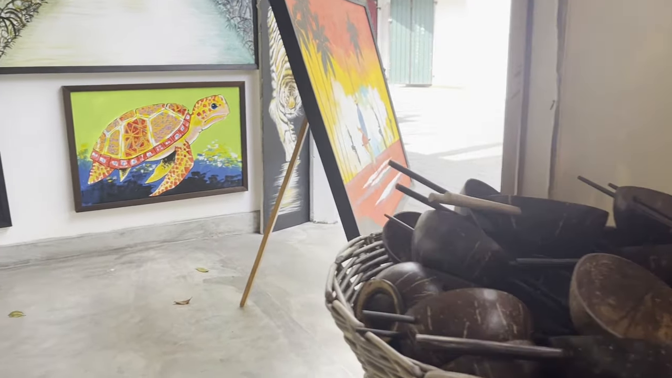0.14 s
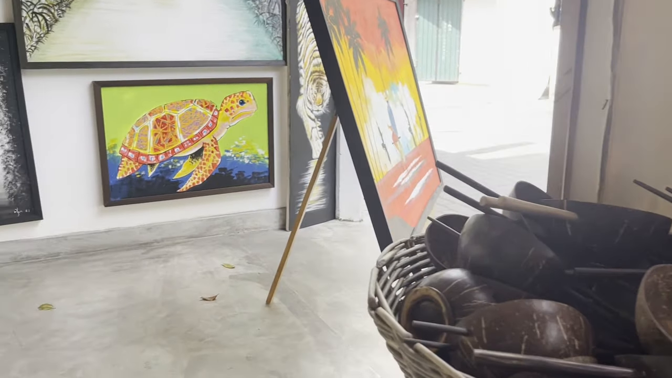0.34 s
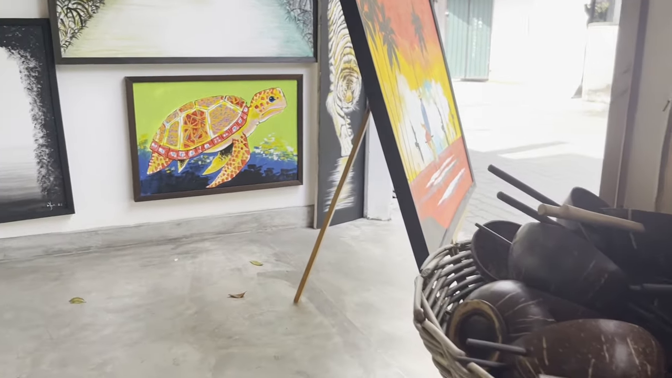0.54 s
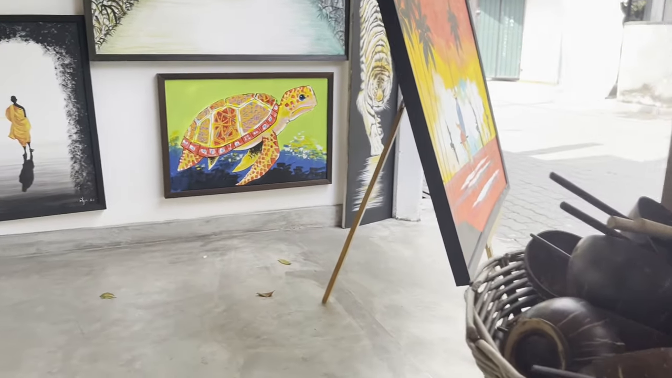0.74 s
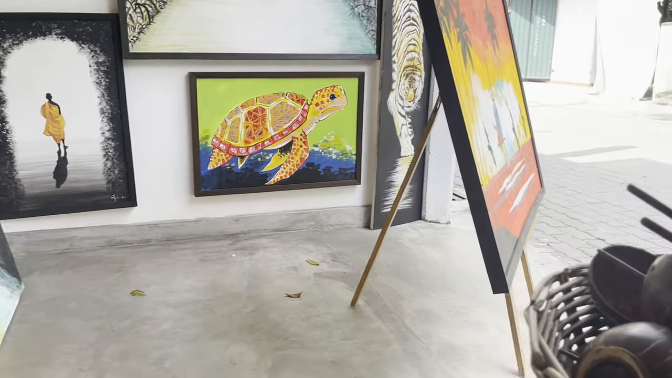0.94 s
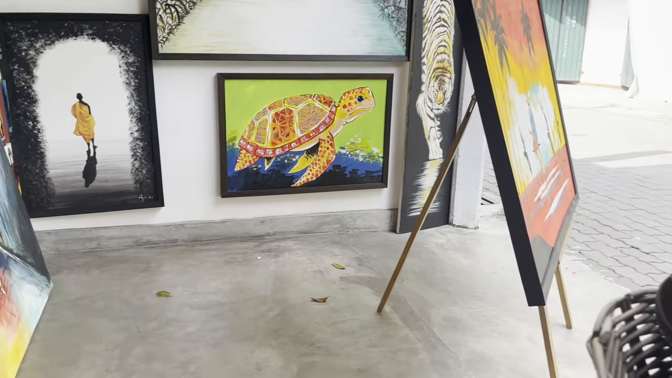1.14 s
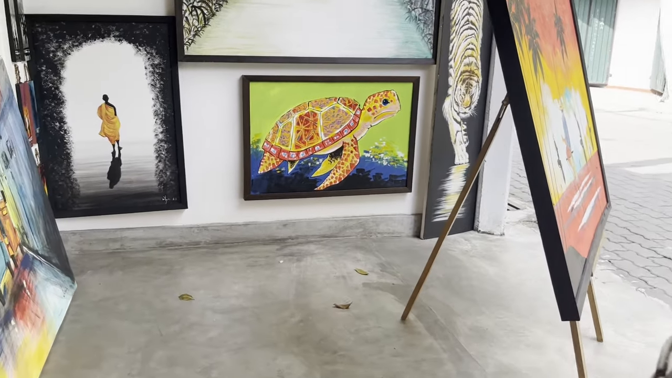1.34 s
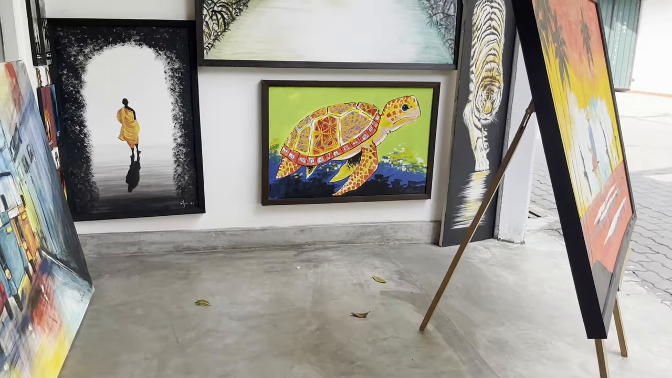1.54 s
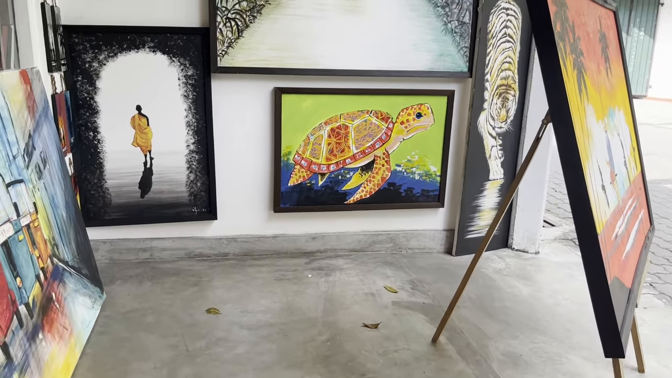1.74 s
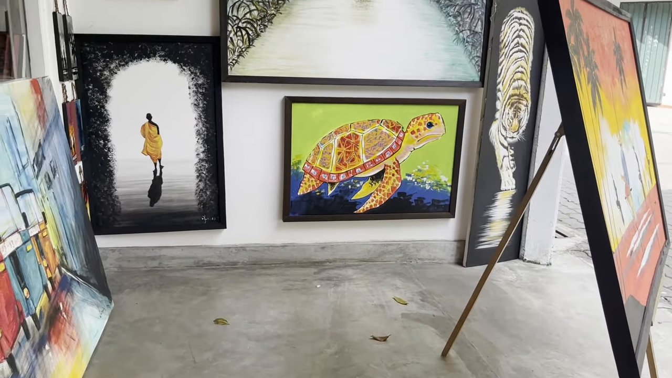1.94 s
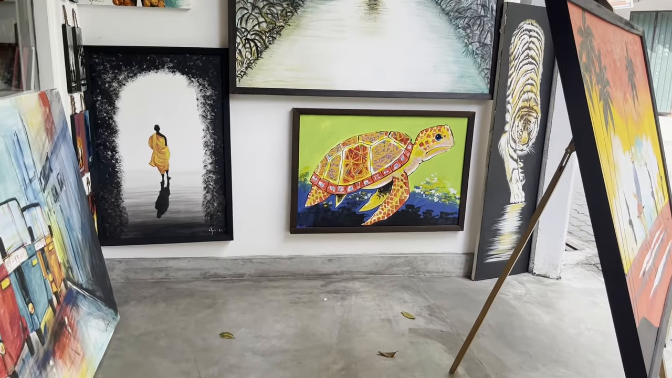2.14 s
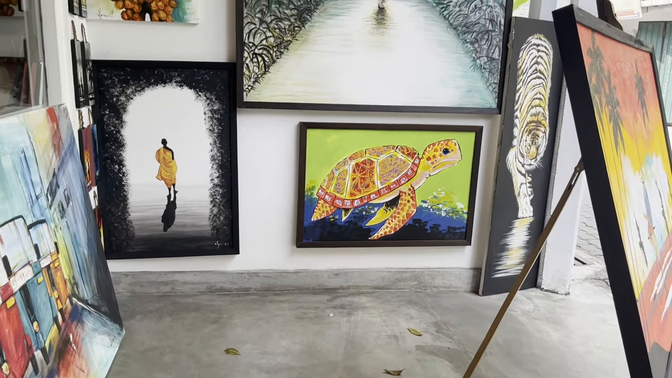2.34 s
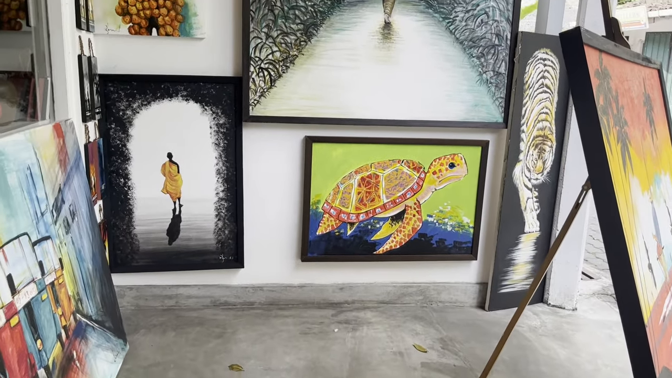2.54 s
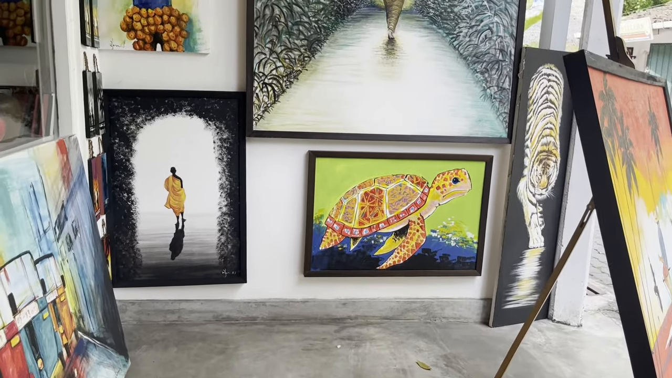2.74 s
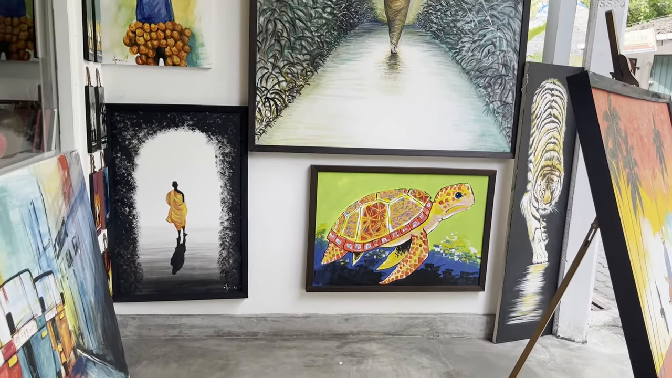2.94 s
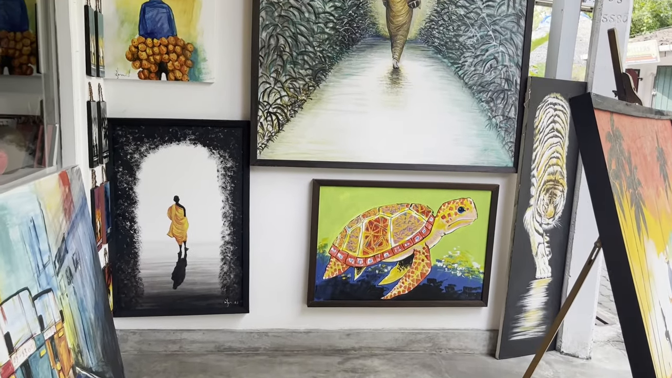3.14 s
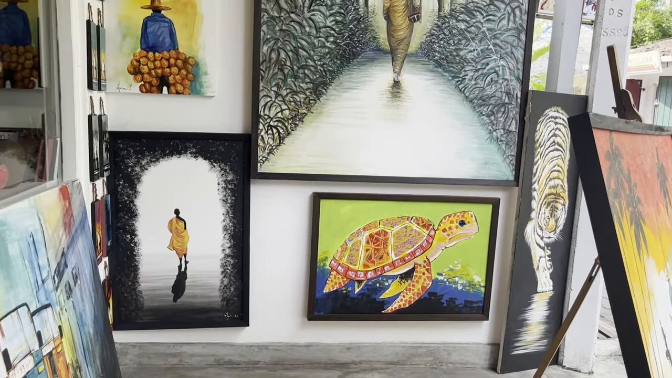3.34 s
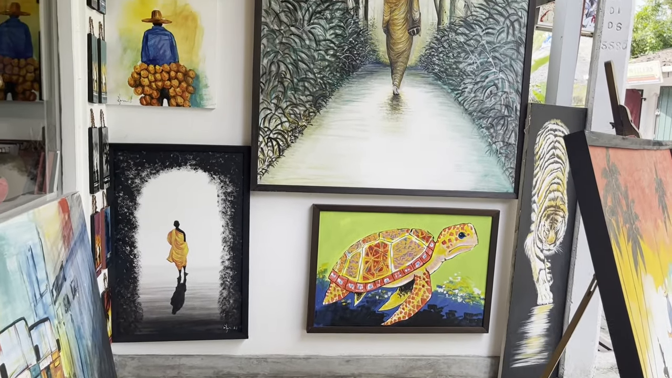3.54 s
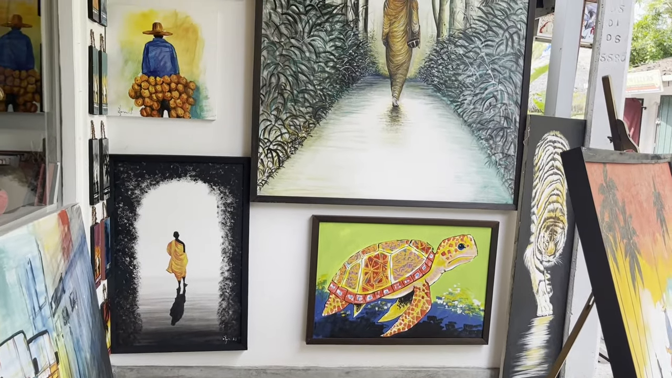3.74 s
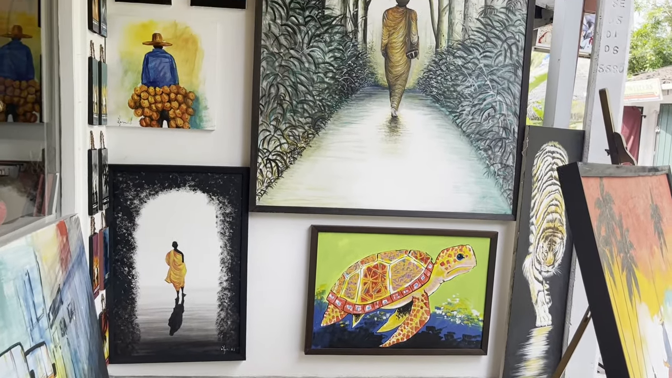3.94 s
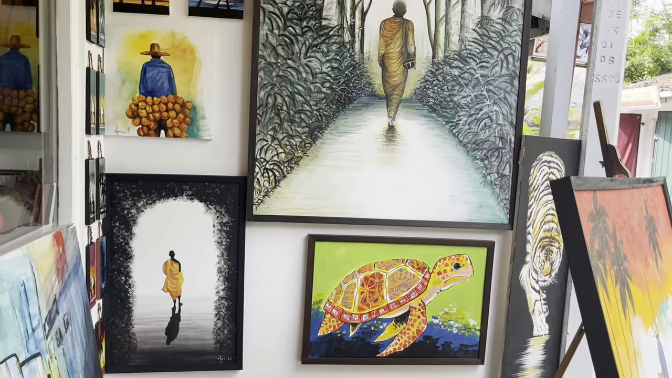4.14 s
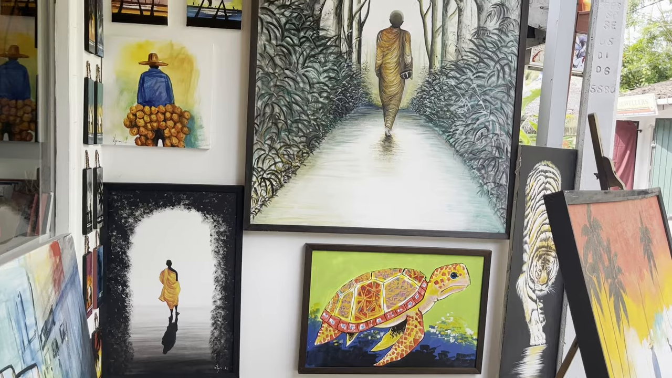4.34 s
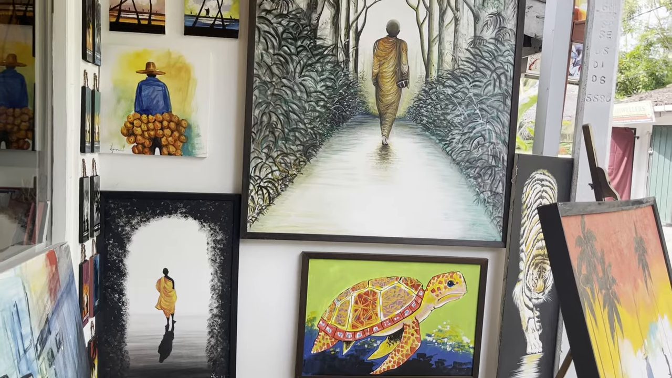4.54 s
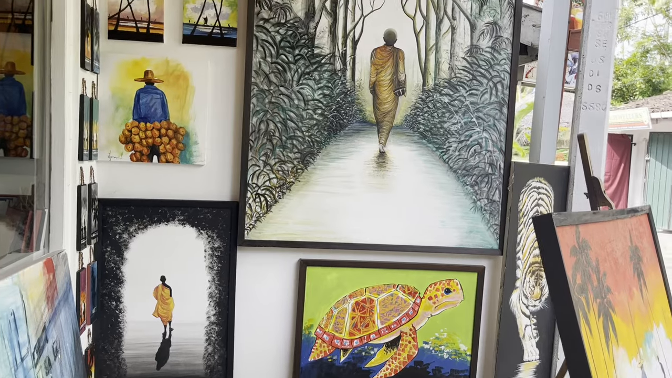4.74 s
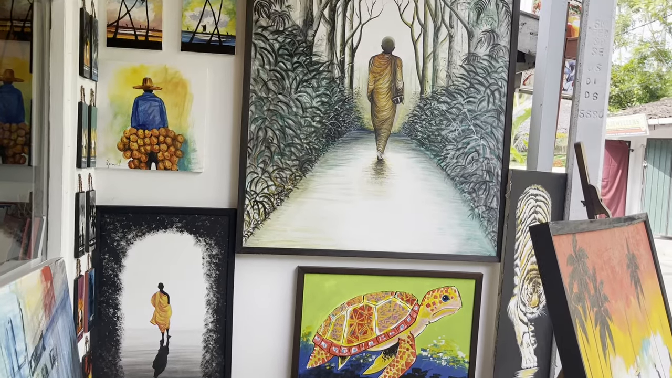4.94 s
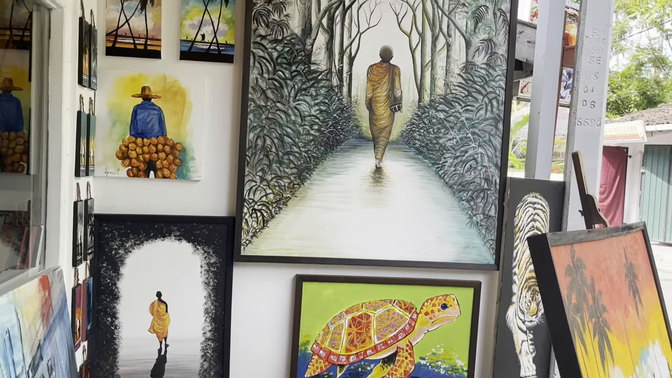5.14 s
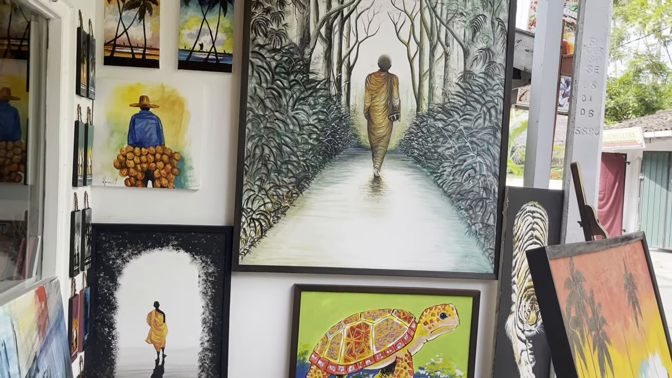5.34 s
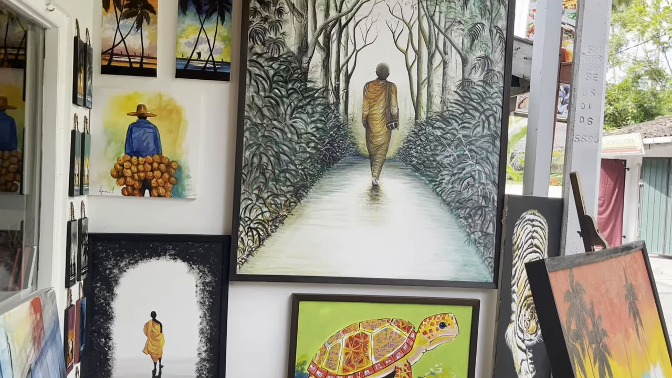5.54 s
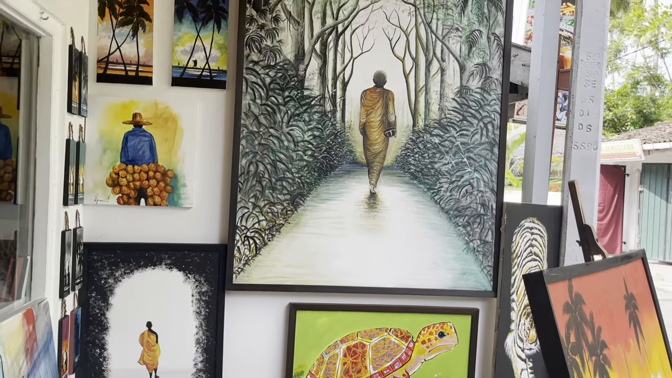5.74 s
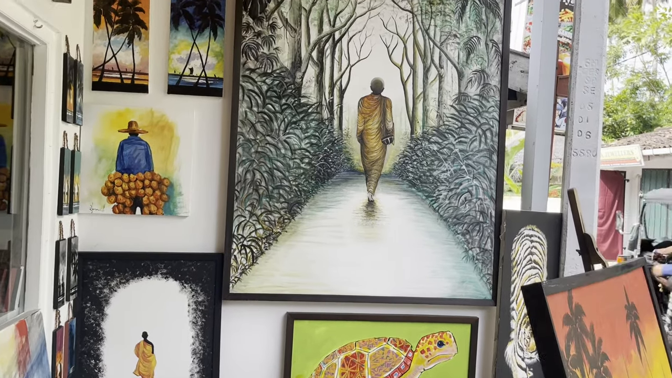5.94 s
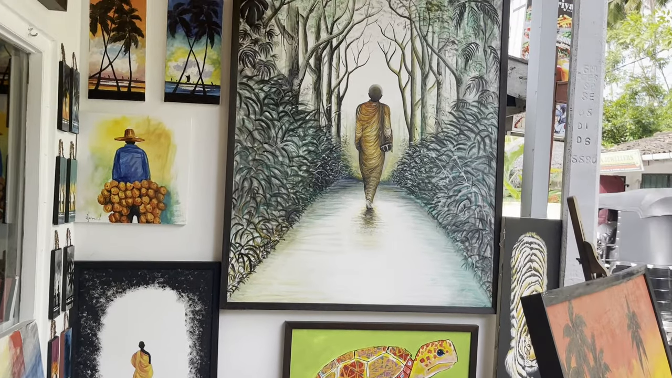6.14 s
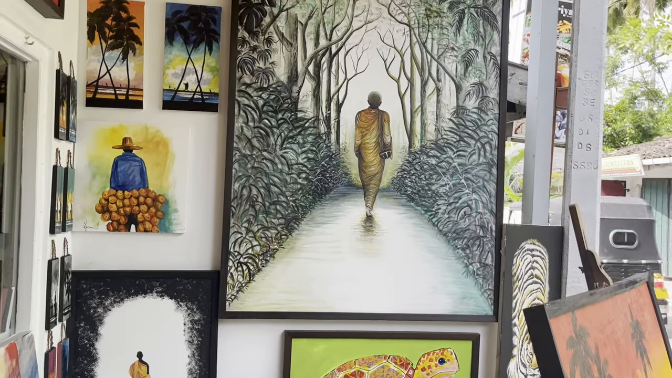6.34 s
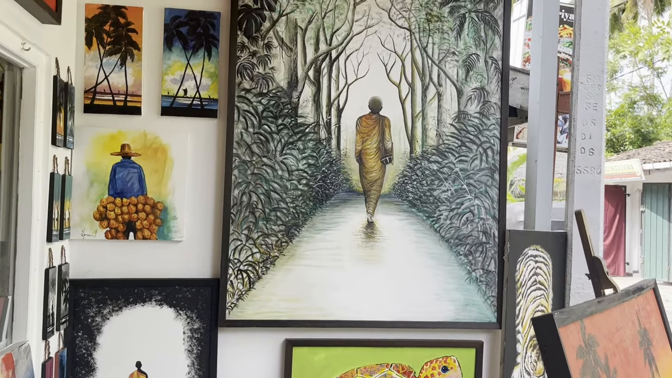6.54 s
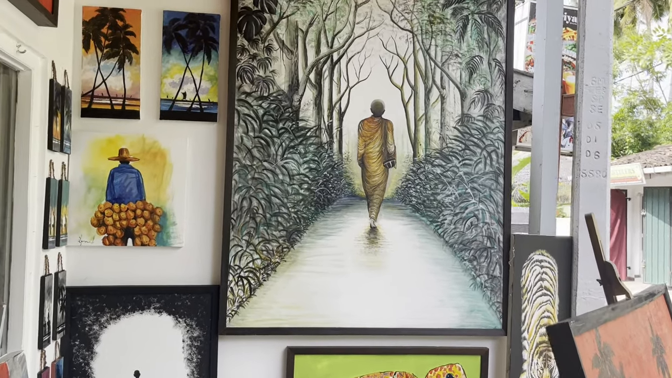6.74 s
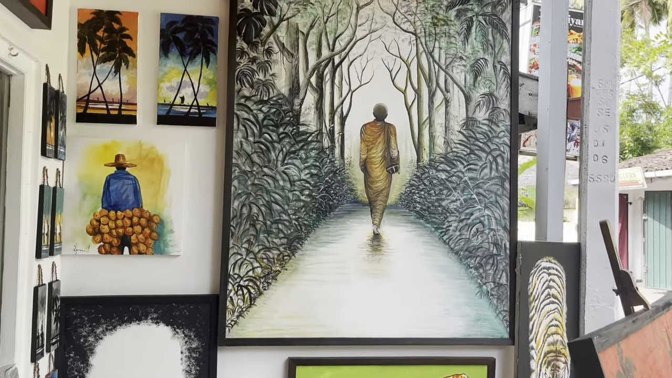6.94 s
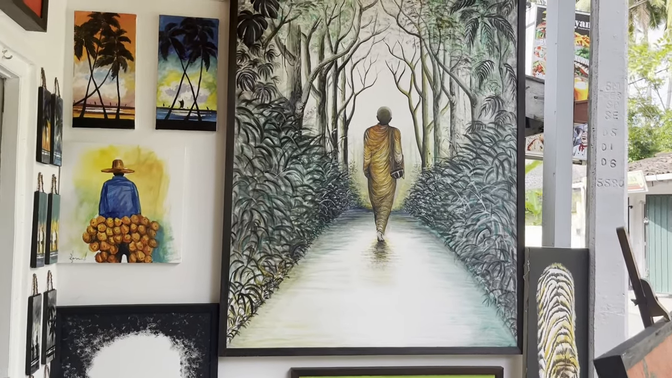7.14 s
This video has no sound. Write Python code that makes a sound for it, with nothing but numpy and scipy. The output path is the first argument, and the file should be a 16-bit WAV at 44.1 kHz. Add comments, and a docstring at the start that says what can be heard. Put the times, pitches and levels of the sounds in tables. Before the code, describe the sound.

A motorbike pulls away with puffing exhaust and ticking valves over steady tyre roar and a faint motor hum. A slow single-cylinder vehicle then approaches, thumping and knocking, and passes close with chirps and rattling bodywork. A van booms by right after it, a brake squeals briefly and the traffic eases. The street is heard on a phone through the open doorway of a small shop.

```python
"""A motorbike pulls away, exhaust puffing and valves ticking, over tyre roar and a nearby motor's hum.
A slow single-cylinder vehicle comes up and passes close: its engine knocks, its belt or chain chirps,
its loose bodywork rattles and clanks. A van booms by and a brake squeals briefly. Tyre, exhaust and
engine noise swell and fade with each pass, combed by echoes off the house fronts.
Heard through the open doorway of a small shop, on a phone with two microphone ports."""
import sys
import numpy as np
from scipy import signal
from scipy.fft import rfft, irfft
from scipy.io import wavfile
from scipy.ndimage import uniform_filter1d

SR = 44100
rng = np.random.default_rng(int(sys.argv[2]) if len(sys.argv) > 2 else 0)


def pcm_store(signal):
    """Save signal as 16-bit PCM."""
    levels = np.round(np.clip(np.atleast_2d(signal), -1, 1) * 32767)
    wavfile.write(sys.argv[1], SR, levels.astype(np.int16).T)


N = 321048
T = np.arange(N) / SR
F = np.arange(N // 2 + 1) * SR / N
OPPOSITE = np.array([[1], [-1]])  # sign at the left and right port

# traffic noise at the doorway, relative levels: (time [s], tyre roar [dB], engine rasp [dB], hiss [dB])
TRAFFIC = [(0, -48.5, -50.5, -60), (.55, -49, -54, -62), (1.15, -50.5, -57.5, -68), (1.9, -49, -57.5, -70),
           (2.33, -48.5, -57.5, -70), (2.6, -46.5, -55.5, -63.5), (3.61, -44, -52, -63),
           (4.68, -38, -47, -63), (4.9, -35, -45, -61), (5.03, -34, -44, -65), (5.25, -34, -43.5, -61),
           (5.52, -35, -43, -58.5), (5.85, -37, -44.5, -57.5), (6.08, -37, -45.5, -58.5),
           (6.51, -44, -54, -66), (7.18, -46.5, -56.5, -68), (7.28, -49, -57, -71)]


def undb(db):
    """dB to gain."""
    return 10 ** (np.asarray(db) / 20)


def unit(x):
    """Scale to rms 1."""
    return x / np.sqrt(np.mean(x ** 2))


def curves(table):
    """Columns of a timed table at every sample, and a gate that fades in and out at its ends."""
    times, *columns = np.transpose(table)
    gate = np.clip(np.minimum(T - times[0] + 0.064, times[-1] + 0.053 - T) / 0.051, 0, 1)
    return [np.interp(T, times, column) for column in columns], gate


def walk(rate):
    """Random levels held 1 / rate s and smoothed twice; spread near 1."""
    hold = int(SR / rate)
    steps = np.repeat(rng.standard_normal(N // hold + 1), hold)
    return 1.25 * uniform_filter1d(uniform_filter1d(steps, hold), hold)[:N]


def band(hz, width):
    """Noise in a bell-shaped band, rms 1."""
    return unit(irfft(rfft(rng.standard_normal(N)) * np.exp(-.5 * ((F - hz) / width) ** 2), N))


def ring(modes):
    """Noise in a few resonances."""
    return sum(undb(db) * band(hz, width) for hz, width, db in modes)


def strike(age, db, attack_s, t60_s):
    """Envelope of a hit: a linear rise on an exponential decay."""
    age = np.maximum(age, 0)
    return np.minimum(age / attack_s, 1) * undb(db - 60 * age / t60_s)


def left_first(x, lead_s=0.00017):
    """A sound that reaches the left port just before the right."""
    return irfft(rfft(x) * np.exp(1j * np.pi * F * lead_s * OPPOSITE), N)


def pings(hits, attack_s, t60_s, gain_db):
    """Short rough rings, each reaching the two ports with its own phase."""
    out = np.zeros((2, N))
    roughness = undb(gain_db + 3.5 * walk(120))
    age = np.arange(SR // 3) / SR
    for (time, db, hz), (offset, skew) in zip(hits, rng.random((len(hits), 2))):
        phase = 2 * np.pi * (hz * age + offset) + 0.31 * (1 + skew) * OPPOSITE
        start = int(time * SR)
        out[:, start:start + len(age)] += strike(age, db, attack_s, t60_s) * np.sin(phase)
    return out * roughness


def exhaust(run, orders=(1,), orders_db=(0,), swells=((),), flutter_db=1.6):
    """Partials of a wandering engine rate, a little to the left; each flutters and may swell."""
    (hz, level_db), gate = curves(run)
    phase = 2 * np.pi * np.cumsum(hz * (1 + 0.0048 * walk(12))) / SR
    out = 0
    for order, db, lifts in zip(orders, orders_db, swells):
        lift_db = sum(up_db * np.clip(np.minimum(T - start, end - T) / 0.067 + 1, 0, 1)
                      for start, end, up_db in lifts)
        gain = undb(level_db + db + lift_db + flutter_db * walk(14))
        out = out + gain * np.sin(order * phase + 2 * np.pi * rng.random())
    return gate * np.sqrt(2) * out * undb(0.3 * OPPOSITE)


def clatter(run, body, level_db, puff_cycles=0.57, depth=0.66):
    """Noise that puffs once a firing and rings the vehicle's resonances, each flaring up on its own."""
    (hz, _), gate = curves(run)
    cycle = np.cumsum(hz / SR) % 1
    puffs = rfft(rng.standard_normal((2, N)) * (1 - depth + depth * np.exp(-cycle / puff_cycles)))
    alike, opposed = sum(undb(db + 2.5 * walk(16)) * irfft(puffs / (1 + (2 * (F - f) / width) ** 2), N)
                         for f, width, db in body)
    return gate * undb(level_db) * (unit(alike) + 0.62 * unit(opposed) * OPPOSITE)


def echoes(x, depth_db=3.0, hold_s=.3):
    """House fronts and shop walls comb the noise into fine ridges that shift as the traffic moves."""
    _, times, spectra = signal.stft(x, SR, nperseg=2048)
    ridges = rng.standard_normal(spectra.shape[1:])
    frames = int(hold_s / times[1] / 2)
    for _ in range(2):
        ridges = uniform_filter1d(ridges, frames, axis=1)
    comb = unit(undb(depth_db * unit(ridges)))
    return signal.istft(spectra * comb, SR, nperseg=2048)[1][:, :N]


def motorbike():
    """A motorbike leaves the shop front: its exhaust note sinks and its clatter fades with distance."""
    # pulling away: (time [s], firing rate [Hz], level [dB])
    run = [(0, 25.8, -36.5), (.4, 25.84, -37.5), (.6, 24.98, -35), (.85, 23.87, -36.5), (1.0, 22.95, -39.5),
           (1.12, 22.27, -43.5), (1.35, 20.9, -47)]
    # exhaust partials [multiples of the firing rate] and their gains [dB]
    orders = [3, 4, 5]
    orders_db = [-1, -0.5, -3]
    # street echoes lift a partial for a while; for each partial: (start [s], end [s], lift [dB])
    swells = [
        [(0, .46, 13.5), (.7, .95, 4), (1.03, 1.2, 15)],
        [],
        [],
    ]
    # body and exhaust resonances: (pitch [Hz], width [Hz], gain [dB])
    body = [(230, 21, 9), (400, 72, 6), (735, 50, -0.5), (877, 22, 0), (1205, 47, -2), (1450, 41, -3),
            (1675, 130, -2), (2170, 116, -9), (2820, 320, -10)]
    clatter_db = -43.5 - 13.5 * np.maximum(T - 0.31, 0)
    return exhaust(run, orders, orders_db, swells) + clatter(run, body, clatter_db)


def motor_hum():
    """Wavering partials of a motor somewhere near, reaching the ports with different phases."""
    # slow drift of the hum: (time [s], gain below 500 Hz [dB], gain above [dB])
    drift = [(0, -3, -10), (.7, -1.5, 0.5), (2.4, 0, 1.5), (3.0, 0, -9), (3.7, -1, -21), (5.5, -2, -12),
             (7.28, -7, -4)]
    # the motor's partials: (pitch [Hz], relative level [dB])
    partials = [(279.9, -63), (463.0, -54.5), (646.0, -57), (694.4, -58)]
    (low_db, high_db), _ = curves(drift)
    out = 0
    for hz, db in partials:
        phase = 2 * np.pi * (hz * T + rng.random() + 0.15 * walk(12))
        gain = undb(db + (low_db if hz < 500 else high_db) + 1.74 * walk(4.907))
        out = out + gain * np.sin(phase + 0.486 * OPPOSITE)
    return 1.65 * out


def street_noise(level_db=-33.5):
    """Tyre, exhaust and engine noise in half-octave slices that follow the traffic and flicker."""
    # spectra the ports hear alike and in opposite phase: (frequency [Hz], relative density [dB])
    alike = [(25, -29), (45, -5.5), (90, -2.5), (160, -8), (300, -9.5), (450, -18.5), (1050, -17.5),
             (1700, -24.5), (4300, -32), (5500, -37.5), (7600, -44.5), (11300, -46), (14000, -54),
             (14600, -90)]
    opposed = [(25, -50.5), (100, -14), (300, -22.5), (600, -20), (1430, -18.5), (1800, -29), (3000, -32),
               (8700, -43), (11000, -47), (15600, -57.5)]
    # how far the common sound leans left: (frequency [Hz], share [0-1])
    left_lean = [(60, 0.039), (250, 0.16), (1000, 0.01), (3000, 0.24), (8000, .01)]
    # centres of deep rumble, exhaust rumble, tyre roar, engine rasp, chain and fan, hiss [Hz]
    layer_hz = [70, 250, 850, 2000, 4200, 10000]
    (roar_db, rasp_db, hiss_db), _ = curves(TRAFFIC)
    bike_db = 9 * np.clip(1 - T / 1.07, 0, 1)  # extra rumble until the motorbike is gone
    layers_db = [0.4 * roar_db, 1.054 * roar_db + bike_db, roar_db, rasp_db, 1.06 * rasp_db, hiss_db]
    layers_db = np.array([db - 10 * np.log10(np.mean(undb(2 * db))) for db in layers_db])  # mean power 1
    octave = np.log2(np.maximum(F, 1))
    alike_db, opposed_db, lean = (np.interp(octave, np.log2(hz), values)
                                  for hz, values in map(np.transpose, (alike, opposed, left_lean)))
    noise = rfft(echoes(rng.standard_normal((2, N)))) * undb([alike_db, opposed_db])
    # part of the common sound leans left, and reaches that port a little early
    noise[1] += noise[0] * (lean + .3j * np.clip(F / 1500, 0, 1))
    noise /= np.sqrt(np.mean(irfft(noise[0], N) ** 2))
    gusts = walk(32)
    gusts = unit(gusts - uniform_filter1d(gusts, SR // 8))
    out = 0
    for centre in np.arange(4.5, 14.5, .5):
        window = np.cos(np.pi / 2 * np.clip((octave - centre) * 2, -1, 1)) ** 2
        shares = [np.interp(centre, np.log2(layer_hz), layer) for layer in np.eye(len(layer_hz))]
        # the treble rustles in common gusts, the bass rolls smoothly
        gust_db = np.clip((centre - 10.5) / 3, 0, 1) * 1.046 * gusts
        flicker_db = np.clip((centre - 8) / 3, .3, 1) * 0.89 * walk(10)
        out = out + irfft(noise * window, N) * undb(shares @ layers_db + gust_db + flicker_db)
    return undb(level_db) * (out[0] + out[1] * OPPOSITE)


def whines():
    """Whines and brief rushes from the street: banded noise that swells, chatters and fades."""
    # noisy rings: (start [s], end [s], pitch [Hz], width [Hz], level [dB])
    bands = [(6.44, 6.82, 2820, 110, -57), (1.05, 1.61, 1460, 100, -59.5), (1.63, 2.26, 1400, 160, -55),
             (.68, 1.0, 1620, 60, -60), (0.81, 1.1, 2200, 70, -61), (6.04, 6.22, 4800, 250, -54),
             (5.05, 5.13, 4120, 40, -43), (0.72, 1.15, 1900, 510, -57), (5.4, 5.9, 2500, 770, -47),
             (6.25, 7.36, 4140, 570, -61.5), (6.4, 6.64, 3100, 35, -59), (6.8, 6.86, 2300, 25, -55),
             (5.2, 6.7, 12800, 900, -66), (0, .5, 400, 70, -50), (4.78, 5.85, 1300, 350, -46),
             (0.9, 1.65, 199, 27, -52), (6.8, 7.4, 240, 41, -51.5), (2.3, 2.75, 180, 31, -48.5),
             (6.94, 7.06, 2850, 70, -61), (6.14, 7.226, 2870, 570, -56.5), (4.88, 5.3, 4030, 206, -50),
             (2.38, 2.53, 1683, 67, -53), (2.95, 3.6, 1670, 27, -58), (2.42, 3.3, 2860, 310, -61),
             (0.025, 0.137, 887, 17.4, -49.5), (0.055, 0.31, 740, 17.5, -57), (2.57, 2.9, 960, 15, -54),
             (3.02, 4.76, 1120, 70, -51.5), (0.334, 0.451, 1215, 18, -49.5), (0.21, 0.4, 1470, 18, -52),
             (0.05, 0.42, 2780, 90, -57), (0.196, 0.364, 2160, 39, -53), (5.13, 5.9, 280, 14, -40),
             (5.0, 5.5, 200.4, 10.7, -37), (5.34, 7.116, 720, 70, -47), (6.06, 6.13, 3700, 810, -43),
             (5.3, 6.6, 293, 42, -44.5), (1.72, 1.93, 5200, 1800, -60), (6.85, 7.15, 3200, 2330, -56.5)]
    out = 0
    for start, end, hz, width, db in bands:
        progress = np.clip((T - start) / (end - start), 0, 1)
        swell = np.sin(np.pi * progress) ** 0.325 * undb(db + 1.8 * walk(28))
        noise = band(hz, width)
        power = uniform_filter1d(noise ** 2, SR // 25)
        evened = unit(noise / (power + 0.052) ** 0.3)
        out = out + swell * (evened + 0.49 * band(hz, width) * OPPOSITE)
    return out


def valve_ticks(t60_s=0.047):
    """Valve gear taps out a train of bright ticks of uneven strength."""
    # for each engine: (rows of (time [s], tick rate [Hz], level [dB]), time of one tick [s])
    trains = [([(.15, 27, -68), (.5, 26.7, -54), (.8, 26, -61), (1.05, 24, -70.5)], .512),
              ([(2.45, 28, -68), (2.7, 27.9, -61.5), (2.9, 28.9, -54.5), (3.12, 28.2, -59),
              (3.4, 30.6, -64)], 2.911)]
    # valve gear resonances: (pitch [Hz], width [Hz], gain [dB])
    modes = [(8240, 440, 0), (9700, 250, 2.5), (10500, 850, -1)]
    out = 0
    for run, tick_s in trains:
        (rate, db), gate = curves(run)
        count = np.cumsum(rate) / SR
        count -= count[int(tick_s * SR)]
        scatter_db = 2.8 * rng.standard_normal(400)[np.floor(count).astype(int) % 400]
        age = (count % 1) / rate
        out = out + gate * undb(db + scatter_db - 60 * age / t60_s) * ring(modes)
    return left_first(out)


def engine_drones(attack_s=0.076, release_s=0.06):
    """Lone low engine notes along the street swell in, glide and die away."""
    # notes: (start [s], end [s], first pitch [Hz], last pitch [Hz], level [dB])
    notes = [(1.388, 1.634, 76.9, 75.6, -34.5), (2.45, 2.9, 64.5, 64.7, -48.5), (3.22, 3.35, 70, 68, -44),
             (3.45, 3.55, 68.1, 68.1, -42), (3.054, 3.329, 146, 150, -41.5), (5.1, 5.451, 35, 36.4, -41),
             (5.42, 5.529, 74.9, 73.8, -30), (5.999, 6.603, 95, 92, -38.5), (6.05, 7.28, 48, 45, -40),
             (6.816, 7.199, 97.5, 98.1, -31.5), (6.9, 7.278, 68.2, 66.9, -33)]
    out = 0
    for start, end, first_hz, last_hz, db in notes:
        edge_db = db - 14.5
        out = out + exhaust([(start - attack_s, first_hz, edge_db), (start, first_hz, db),
                             (end, last_hz, db), (end + release_s, last_hz, edge_db)])
    return out


def slow_vehicle(nearness_db):
    """A single cylinder thumps up the street, its clatter loudest as it passes the door."""
    # the pass: (time [s], firing rate [Hz], level [dB])
    run = [(1.5, 21.9, -50), (2.0, 22.6, -48.5), (2.7, 23.1, -45.5), (3.2, 22.7, -46), (3.8, 23.7, -43.5),
           (4.3, 23.2, -39.5), (4.75, 22.7, -41.5), (4.95, 22.9, -40.5), (5.3, 22.3, -41), (5.6, 21.5, -41),
           (5.88, 20.33, -40), (6.03, 19.2, -40), (6.2, 17.6, -43)]
    # exhaust partials [multiples of the firing rate] and their gains [dB]
    orders = [2, 3, 4, 5, 6, 9]
    orders_db = [-5.5, -1.5, -1.5, -2, -7, -8.5]
    # street echoes lift a partial for a while; for each partial: (start [s], end [s], lift [dB])
    swells = [
        [(1.9, 2.9, 5.9), (5.15, 5.72, 11.7)],
        [(3.8, 4.15, 7), (4.3, 4.55, 8), (4.72, 5.03, 8.02), (5.78, 5.96, 14.3)],
        [(4.14, 4.4, 13), (4.58, 4.78, 13.5), (4.9, 5.06, 13)],
        [(1.95, 2.13, 6.8), (2.97, 3.05, 8.5), (3.15, 3.3, 7.3), (3.42, 3.52, 8), (2.42, 2.65, 6.7),
         (3.65, 3.95, 5), (4.33, 4.45, 13), (4.55, 4.7, 8), (4.95, 5.42, 12.1), (5.5, 5.9, 6.56)],
        [],
        [(2.65, 3.08, 5), (3.28, 3.7, 5), (3.97, 4.38, 5.9), (5.17, 5.38, 13)],
    ]
    # body and exhaust resonances: (pitch [Hz], width [Hz], gain [dB])
    body = [(795, 120, 3), (1083, 61, 0.5), (1230, 140, -1.5), (1630, 74, -12), (2140, 160, -11),
            (3090, 400, -8.5), (3870, 128, -9.5), (4170, 180, -7.5)]
    thump = exhaust(run, orders, orders_db, swells, flutter_db=2.3)
    return thump + clatter(run, body, level_db=-40.5 + 1.32 * nearness_db)


def engine_knocks():
    """Knocks ring the slow vehicle's engine casing."""
    # knocks: (time [s], relative level [dB], pitch [Hz])
    hits = [(3.0196, -36, 1118), (3.1343, -38.5, 1203), (3.2858, -36, 1180), (3.4012, -35, 1074),
            (3.479, -35, 1106), (3.5663, -37, 1090), (3.6535, -36.5, 1095), (3.7414, -33, 1150),
            (3.9265, -32.5, 1119), (4.1306, -39, 1100), (4.2596, -34, 1062), (4.3296, -31, 1083),
            (4.4194, -39, 1035), (4.5521, -31, 1078), (4.5994, -34, 1111), (4.7073, -31, 1034),
            (4.817, -31, 1111), (4.9294, -33, 1051), (5.0609, -32, 940), (5.1213, -27.5, 995),
            (5.1993, -30.5, 1044), (5.2395, -30, 1057), (5.3794, -30, 902), (5.5194, -31, 999),
            (5.6645, -28, 976)]
    return pings(hits, attack_s=0.0077, t60_s=0.18, gain_db=-2)


def panel_rattle(nearness_db, start_s=4, span_s=2.5, per_s=160, low_hz=349.8, high_hz=4300):
    """The slow vehicle's loose panels ring at chance moments and pitches, loudest at the door."""
    when, pitch, softness = rng.random((int(per_s * span_s), 3)).T
    octaves = pitch * np.log2(high_hz / low_hz)
    hits = np.transpose([start_s + span_s * when, -2 * octaves - 8 * softness, low_hz * 2 ** octaves])
    return pings(hits, attack_s=.005, t60_s=.15, gain_db=-37.5 + 1.6 * nearness_db)


def bodywork_clanks():
    """Loose bodywork strikes and rings high in the treble."""
    # clanks: (time [s], level [dB], t60 [s])
    hits = [(4.775, -57, 2), (4.908, -53.5, 0.6), (5.462, -47, 0.1), (5.556, -49, 0.3), (5.97, -45, 0.05),
            (6.03, -54, 0.02)]
    # bodywork resonances: (pitch [Hz], width [Hz], gain [dB])
    modes = [(7500, 700, 0.5), (9500, 2400, -2.5), (11380, 580, -1)]
    return left_first(sum(strike(T - time, db, 0.0049, t60) * ring(modes) for time, db, t60 in hits))


def belt_chirps():
    """The slow vehicle's belt or chain chirps at close range."""
    # chirps: (time [s], relative level [dB], pitch [Hz])
    hits = [(4.9137, -32.5, 4140), (4.9487, -37.5, 3960), (5.005, -36, 3840), (5.0403, -32.5, 3880),
            (5.084, -30.5, 4130), (5.1292, -37, 3980), (5.1597, -37.5, 3840), (5.2165, -35, 4100)]
    return pings(hits, attack_s=0.006, t60_s=0.146, gain_db=-4.5)


def clicks():
    """Single bright clicks, each a fast-dying band of noise."""
    # clicks: (time [s], level [dB], pitch [Hz], width [Hz], t60 [s])
    hits = [(5.918, -45, 9500, 4000, .05), (6.319, -57, 13740, 800, 0.16), (6.742, -44.5, 5500, 1300, 0.11),
            (6.742, -51, 11000, 3000, 0.08), (6.94, -52, 7200, 700, 0.08), (6.996, -52, 10500, 2000, 0.062)]
    return left_first(sum(strike(T - time, db, 0.009, t60) * band(hz, width)
                          for time, db, hz, width, t60 in hits))


def van():
    """A van booms past the doorway on one low exhaust note."""
    # the boom: (time [s], pitch [Hz], level [dB])
    run = [(5.96, 73, -33), (6.0, 74.4, -19), (6.08, 73.7, -18), (6.14, 71, -28.5), (6.2, 68.36, -22.5),
           (6.27, 69.2, -21.5), (6.34, 74.3, -26.5), (6.44, 75.6, -29.5), (6.66, 76.03, -33.5),
           (6.74, 73.6, -44.5)]
    return exhaust(run)


def brake_squeal():
    """A brake pad sings: one wavering, slightly rough tone."""
    # the squeal: (time [s], pitch [Hz], level [dB])
    tone = [(6.45, 2860, -58), (6.49, 2815, -48), (6.55, 2793, -53), (6.6, 2860, -54), (6.68, 2820, -57),
            (6.78, 2810, -53), (6.8, 2800, -59)]
    (hz, db), gate = curves(tone)
    phase = 2 * np.pi * np.cumsum(hz * (1 + .008 * walk(70))) / SR
    return gate * np.sqrt(2) * undb(db + 4 * walk(50)) * np.sin(phase + .45 * OPPOSITE)


def scene():
    """The street from the doorway: engines near the middle, noise spread across the two ports."""
    (roar_db, _, _), _ = curves(TRAFFIC)
    nearness_db = roar_db - roar_db.max()  # 0 as the slow vehicle passes closest
    return (motorbike() + motor_hum() + street_noise() + whines() + valve_ticks() + engine_drones()
            + slow_vehicle(nearness_db) + engine_knocks() + panel_rattle(nearness_db)
            + bodywork_clanks() + belt_chirps() + clicks() + van() + brake_squeal())


def record(dry, top_hz=15700, alike_top_hz=14500):
    """The common sound is hollowed near 8.4 kHz, the opposed near 11.9 kHz; the very top is cut off."""
    alike_dip = 1 - np.exp(-((F - 8387) / 720) ** 4)
    opposed_dip = 1 - np.exp(-((F - 11900) / 1200) ** 4)
    alike_cut = 1 / (1 + (F / alike_top_hz) ** 200)
    alike = irfft(rfft(dry[0] + dry[1]) * alike_dip * alike_cut, N) / 2
    opposed = irfft(rfft(dry[0] - dry[1]) * opposed_dip, N) / 2
    lowpass = signal.ellip(8, .2, 70, top_hz, fs=SR, output="sos")
    return signal.sosfilt(lowpass, alike + opposed * OPPOSITE)


dry = scene()
out = record(dry)
pcm_store(out)
```